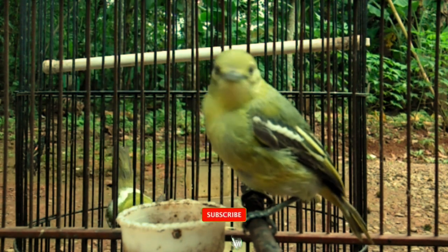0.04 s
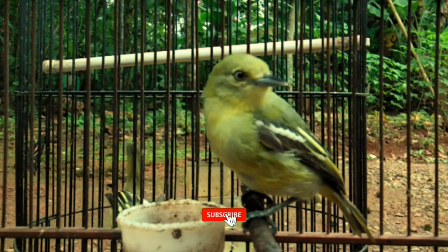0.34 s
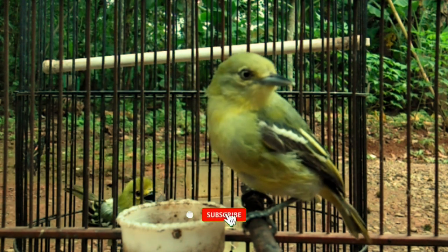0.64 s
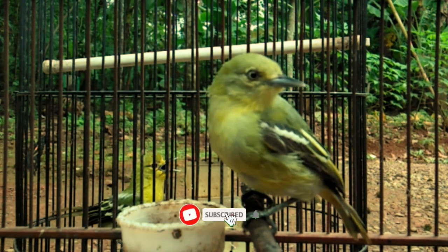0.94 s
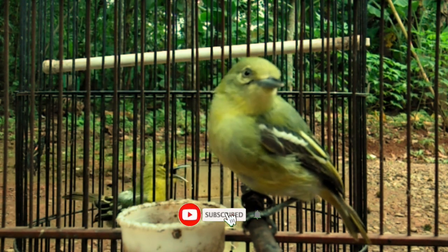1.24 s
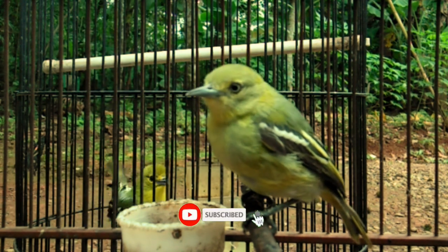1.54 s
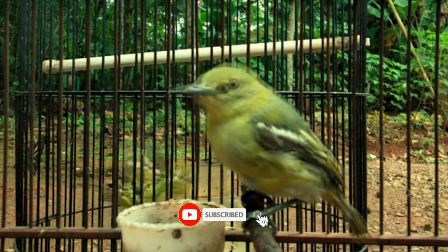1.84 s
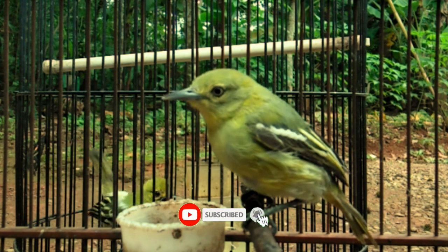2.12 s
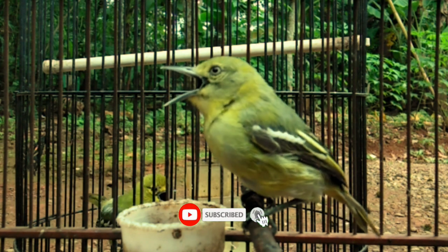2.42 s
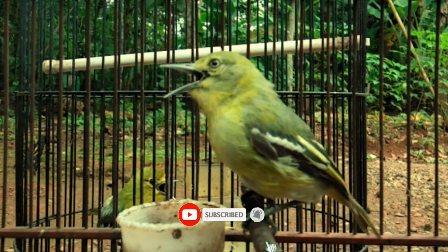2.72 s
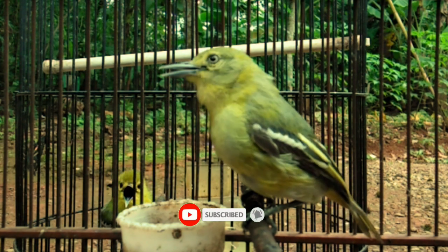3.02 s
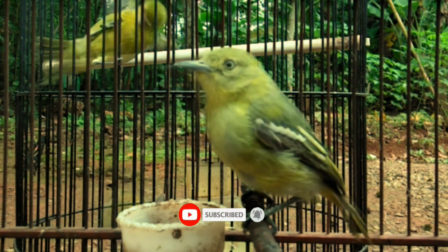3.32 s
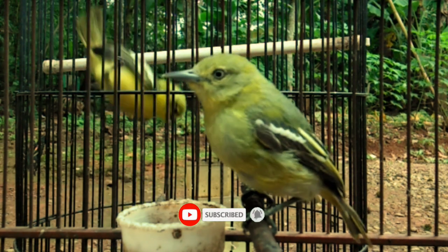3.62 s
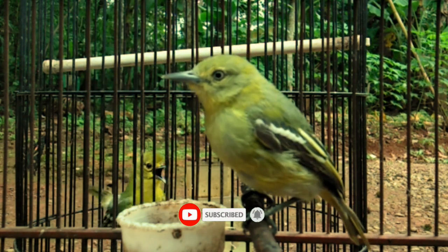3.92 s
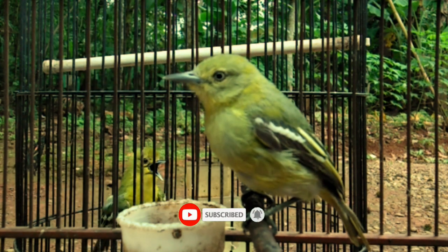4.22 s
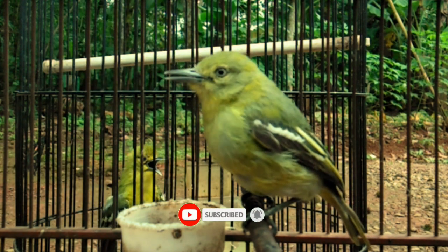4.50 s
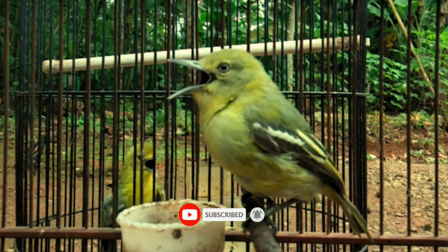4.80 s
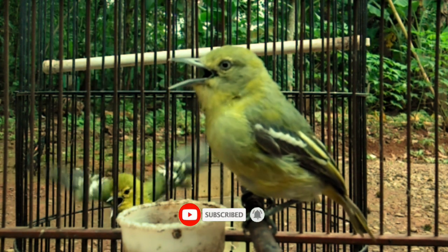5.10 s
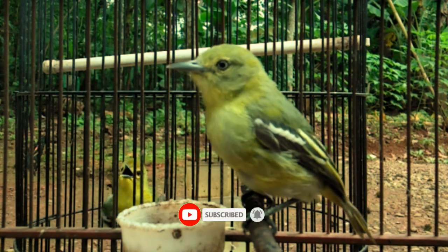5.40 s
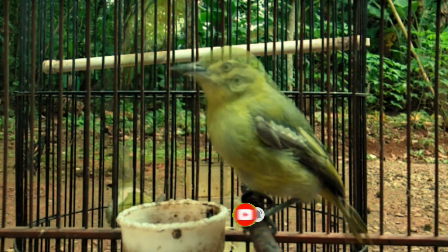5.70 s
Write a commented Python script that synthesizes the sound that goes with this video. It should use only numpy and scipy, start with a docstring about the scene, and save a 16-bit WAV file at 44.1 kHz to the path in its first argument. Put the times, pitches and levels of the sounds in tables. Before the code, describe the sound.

A songbird in an outdoor cage, heard up close, lets out two loud, hoarse, descending rasps about two seconds apart, each trailing into a quiet clicking chatter. A second, much softer bird adds short runs of rising pips, muttering, a quick flutter and a clear whistle leading into the second rasp. The cage ticks once near the end. Thin insect shrills, faint distant calls and a low rumble lie behind.

```python
"""A caged iora, close by, gives two loud falling rasps, each ending in a low chatter.
Air drives both sides of its syrinx in about fifty bursts a second; the chatter is clicks ringing its throat.
A second bird pips, whistles, mutters softly and flutters. One sharp tick comes from the cage.
Insects shrill behind them over a low outdoor rumble and faint far calls."""
import sys
import numpy as np
from scipy import signal
from scipy.fft import rfft, irfft
from scipy.io import wavfile
from scipy.ndimage import uniform_filter1d, minimum_filter1d

SR = 44100
rng = np.random.default_rng(int(sys.argv[2]) if len(sys.argv) > 2 else 0)


def bounce(signal):
    """Save signal as a 16-bit WAV file at the path given by the first command-line argument."""
    frames = np.transpose(np.atleast_2d(signal))
    limited = np.clip(frames, -1, 1)
    pcm = np.round(limited * 32767).astype(np.int16)
    wavfile.write(sys.argv[1], SR, pcm)


N = 253575
T = np.arange(N) / SR


def rasp(start_s, length_s, attack_s, burst_hz, peak_db, swell_db, opening_s, fall_s, end_hz, overtone_db):
    """Falling buzz: air bursts drive two voices, rush through the beak and ring the throat."""
    # air rush through the open beak: freq_hz, gain_db
    beak = [(600, -13), (1100, -13), (1550, 0), (2050, 0), (2400, -2), (2800, 6), (3300, 2.5), (5000, 10.5),
            (6400, -1), (7700, -18), (8700, -19.5), (13000, -19.5), (15500, -8)]
    top_hz, opening_hz, settle_s, lower_ratio = 5910, 610, .13, .9
    swell_s, hold_s, release_s, relax_s = .18, .1, .028, .098
    lead_change_s, slowing_hz = .07, 3.8
    end_s, progress = start_s + length_s, ramp(start_s, length_s)
    hz = top_hz + (end_hz - top_hz) * ramp(start_s, fall_s) ** 2.15
    upper_hz = hz + opening_hz * (1 - ramp(start_s + opening_s, settle_s))
    # upper voice leads at the opening and the close, nearly level between
    lead_db = 5.5 - 4 * ramp(start_s + opening_s - lead_change_s / 2, lead_change_s)
    lead_db += 8.5 * ramp(end_s - .16, lead_change_s)
    fade_start_s = start_s + attack_s + swell_s + hold_s
    slack = 1 - ramp(start_s + attack_s, swell_s) + .83 * ramp(fade_start_s, end_s - fade_start_s)
    effort_db = -swell_db * slack - 29 * (1 - ramp(start_s, attack_s))
    effort_db -= 9.5 * ramp(end_s - release_s, release_s)
    cycles = np.cumsum((burst_hz - slowing_hz * progress) * (T > start_s)) / SR
    burst = np.sin(np.pi * (cycles + .03 * wander(25))) ** 2
    push = burst ** .9
    lead = undb(lead_db + 2 * wander(25))
    both_sides = syrinx(hz * lower_ratio, burst) + lead * syrinx(upper_hz, burst)
    fundamentals, overtones = both_sides / np.hypot(1, lead)
    overtones *= undb(overtone_db - 4.5 * ramp(end_s - relax_s, relax_s))
    # membranes keep swinging between bursts, less so late in the call; overtones throb least
    leak = .51 - .478 * progress
    voices = fundamentals * (push + leak) / (.68 + leak) + overtones * (push + 1) / 1.5
    rush_level = undb(-36 + .05 * effort_db) * np.sqrt(gate(start_s, end_s, edge_s=.01))
    rush = noise(beak) * (burst + .099) * rush_level
    throat_hz = 1600 + 484 * progress + 170 * wander(300)
    undertone = tone(throat_hz) * burst * undb(-47) * np.sqrt(progress)
    voices *= undb(peak_db - 2 + effort_db + 1.08 * wander(25))
    return gate(start_s, end_s) * (voices + rush + undertone)


def syrinx(hz, burst, arch_hz=360, jitter_hz=200, shimmer_db=2.5, hoarseness=.12):
    """One side of the syrinx as [fundamental, overtones]; pitch arches with each burst and shakes."""
    # overtone strength by where it falls: freq_hz, gain_db
    overtone_curve = [(6000, -16), (8000, -37), (9800, -34.5), (11000, -38.5), (12200, -29), (13400, -26),
                      (14700, -12), (16000, -18.5)]
    # windpipe passband with a sharp lower edge: freq_hz, gain_db
    windpipe = [(1500, -26), (2500, -22), (2900, -14), (3150, 0), (5300, 0), (6500, 0), (7800, 3),
                (8700, -6), (11000, -9), (15000, -3)]
    hz = hz * (1 + .012 * wander(40)) + arch_hz * (burst - .75) + jitter_hz * wander(550)
    freq_hz, gain_db = np.transpose(overtone_curve)
    overtones = sum(tone(k * hz) * undb(np.interp(k * hz, freq_hz, gain_db)) * (k * hz < SR * .4)
                    for k in (2, 3))
    # uneven swings spread a hoarse skirt around the pitch
    fundamental = tone(hz) * (1 + hoarseness * wander(1900))
    return np.array([colour(fundamental, windpipe), overtones]) * unit(undb(shimmer_db * wander(600)))


def chatter(creak_hz=149.4, slowing_s=.02, hiss_db=-19, hiss_s=.00034, ring_attack_s=.0013):
    """Creaky notes: clicks slow down while the lowest throat resonance rises and grows."""
    # notes: start_s, length_s, level_db, first_click_hz, bright_mode_db
    notes = [(3.004, 0.025, -37.5, 900, -28), (3.013, 0.06, -35.5, 448, -25),
             (3.085, 0.047, -37, 477.7, -18), (3.157, 0.045, -39, 476, -15), (3.228, 0.037, -44, 449, -22),
             (3.298, 0.037, -49.5, 445, -22), (3.372, 0.033, -61, 453, -22),
             (5.306, 0.026, -40.5, 747, -16), (5.323, 0.031, -43.5, 514, -10),
             (5.348, 0.029, -44, 709, -13), (5.373, 0.047, -42, 600, 13.5)]
    # throat resonances, low to bright: freq_hz, width_hz, gain_db, rise_share
    throat = [(1790, 320, 0, .38), (2480, 300, 0, .08), (3230, 400, 0, .04), (4700, 900, 0, .25)]
    out, t = np.zeros(N), T[:SR // 10]
    for start_s, length_s, level_db, first_click_hz, bright_mode_db in notes:
        progress = np.clip(t / length_s, 0, 1)
        click_hz = creak_hz + (first_click_hz - creak_hz) * np.exp(-t / slowing_s)
        click_hz *= 1 + .1 * wander(300)[:len(t)]
        cycles = np.floor(np.cumsum(click_hz) / SR)
        clicks = np.flatnonzero(np.diff(cycles) * (progress[1:] < 1))
        age_s, place = np.maximum(t - t[clicks, None], 0), progress[clicks, None]
        strength = np.clip(np.minimum(place, 1 - place) / .21, 0, 1)
        low_mode_db = 5 - 20 * np.log2(first_click_hz / 462)  # weaker after a fast start
        weights = [undb(low_mode_db) * (.25 + 1.55 * place), 2.83 * np.exp(-1.9 * place),
                   1.05 - .23 * place, undb(bright_mode_db)]
        pulses = undb(hiss_db) * np.exp(-age_s / hiss_s) * (age_s > 0) * rng.standard_normal(len(t))
        for (freq_hz, width_hz, gain_db, rise_share), weight in zip(throat, weights):
            ring = np.exp(-np.pi * width_hz * age_s) * (1 - np.exp(-age_s / ring_attack_s))
            mode_hz = freq_hz * (1 + rise_share * (place - .5))
            pulses += weight * undb(gain_db) * ring * np.sin(2 * np.pi * mode_hz * age_s)
        note = unit((strength * pulses).sum(axis=0))
        i = int(start_s * SR)
        out[i:i + len(t)] += note * undb(level_db) * np.sqrt(t[-1] / length_s)
    return colour(out, [(500, -12), (1400, -9), (7000, -6), (10000, -21.5)])


def whistle(start_s=4.388, break_s=4.495, end_s=4.768, high_hz=3116, held_hz=2972):
    """Second bird's nearly pure note: scoops up, steps down, swells and flicks up at the end."""
    scoop_hz, scoop_s, flick_hz, flick_s = 240, .022, 238, .0086
    step_s, swell_s, release_s = .012, .2, .022
    age_s, left_s = np.maximum(T - start_s, 0), np.maximum(end_s - T, 0)
    step = ramp(break_s - step_s / 2, step_s)
    hz = high_hz + (held_hz - high_hz) * step
    hz += flick_hz * np.exp(-left_s / flick_s) - scoop_hz * np.exp(-age_s / scoop_s)
    hz *= 1 + .0035 * wander(60)
    level_db = -28.5 - 24.5 * (1 - ramp(start_s, swell_s)) - 6.5 * step
    level = undb(level_db) * np.minimum(left_s / release_s, 1) * gate(start_s, end_s)
    return (tone(hz) + undb(-21) * tone(2 * hz) + undb(-34) * tone(4 * hz)) * level


def pips(count=5, target_hz=3004, first_flat_hz=220, half_length_s=.014, droop=.15):
    """Second bird's runs of short arched notes that climb and grow louder."""
    # pip runs: start_s, spacing_s, first_db, growth_db_per_pip
    runs = [(1.187, .0741, -56.5, 1.8), (4.068, 0.072, -56.5, 0.8)]
    out = np.zeros(N)
    for start_s, spacing_s, first_db, growth_db in runs:
        for k in range(count):
            offset = np.clip((T - start_s - k * spacing_s) / half_length_s, -1, 1)
            hz = (target_hz - first_flat_hz / 2 ** k) * (1 - droop * offset ** 2)
            out += tone(hz) * undb(first_db + k * growth_db) * np.cos(np.pi * offset / 2) ** 2
    return out


def mutter(throb_hz=40, throb_depth=.31, attack_s=.066, release_s=.31):
    """Second bird's soft throbbing noise under its pips."""
    # mutters: start_s, length_s, level_db
    mutters = [(1.228, 0.58, -59), (4.077, 0.29, -61.5)]
    # mutter spectrum: freq_hz, gain_db
    spectrum = [(1100, -19), (1800, -1.5), (2300, -4), (3200, 2.5), (4000, 3), (5200, -9), (7000, -12.5),
                (10000, -54)]
    throb = unit(1 + throb_depth * tone(throb_hz * (1 + .051 * wander(6.6))))
    level = sum(undb(db) * ramp(start_s, attack_s) * (1 - ramp(start_s + length_s - release_s, release_s))
                for start_s, length_s, db in mutters)
    return noise(spectrum) * throb * level


def wings(beat_hz=29.9):
    """Second bird's feathers brush the air in quick soft beats."""
    # flutters: start_s, length_s, level_db
    flutters = [(3.62, .09, -66), (3.735, 0.055, -63.5)]
    # feather noise: freq_hz, gain_db
    spectrum = [(300, -4), (900, 4), (2200, 1), (4000, -11), (14000, -13)]
    beats = unit(np.sin(np.pi * beat_hz * T) ** 2 + .4)
    level = sum(undb(db) * gate(start_s, start_s + length_s, edge_s=.014)
                for start_s, length_s, db in flutters)
    return noise(spectrum) * beats * level


def cage_tick(start_s=5.411, gain_db=-22, snap_s=.00046):
    """A small hard knock on the cage: a snap and a brief ring."""
    # cage modes: freq_hz, level_db, t60_s
    modes = [(1960, -35, 0.004), (3050, 0.5, 0.0037), (6450, -14, 0.0048), (11260, -11, 0.014),
             (12070, -10.5, 0.026), (12800, -18, .02), (14800, -7, .003)]
    t = np.maximum(T - start_s, 0)
    ring = sum(undb(db - 60 * t / t60_s) * np.sin(2 * np.pi * hz * t) for hz, db, t60_s in modes)
    snap = .32 * noise([(600, -29), (1600, 6)]) * np.exp(-t / snap_s)
    return undb(gain_db) * colour((ring + snap) * (t > 0), [(600, -13), (1600, 1)])


def surroundings(x, scatter_db=-8, scatter_t60_s=.11, tail_db=-29, tail_t60_s=.3):
    """Adds close echoes, quick scatter round the cage and a faint short tail."""
    # echoes off close surfaces: delay_s, gain_db
    echoes = [(.000607, -10), (.00076, -16), (.000912, -15), (.001228, -13)]
    t = T[:SR // 2]
    scatter, tail = rng.standard_normal((2, len(t))) * (t > .002)
    scatter = undb(scatter_db) * unit(scatter * undb(-60 * t / scatter_t60_s))
    tail = undb(tail_db) * unit(tail * undb(-60 * t / tail_t60_s))
    response = (scatter + tail) / np.sqrt(len(t))
    for delay_s, gain_db in echoes:
        response += undb(gain_db) * np.sinc((t - delay_s) * SR)
    return x + signal.fftconvolve(x, response)[:N]


def shrill_insects(upper_hz=4510, lower_hz=4260, drift_hz=14, tremble_hz=28, shimmer=.56):
    """Two unbroken shimmering shrills; the lower one quietens for a while."""
    # upper insect's loudness: time_s, level_db
    upper_levels = [(0, -60), (.45, -63), (1.2, -64.5), (1.65, -61.5), (1.87, -65), (2.15, -58.5),
                    (3.4, -63.5), (5.75, -63.5)]
    upper_db = np.interp(T, *np.transpose(upper_levels))
    lower_db = -66 - 8 * gate(1.66, 3.48, edge_s=.091)
    out = np.zeros(N)
    for hz, level_db in ((upper_hz, upper_db), (lower_hz, lower_db)):
        pitch_hz = hz + drift_hz * wander(1.5) + tremble_hz * wander(140)
        out += tone(pitch_hz) * undb(level_db + wander(6)) * unit(1 + shimmer * wander(70))
    return out


def cricket(octave_db=-4, whine_db=-1, whine_floor_db=-83):
    """A thin insect note in stretches; its fourth harmonic whines on between them."""
    # song stretches: start_s, end_s, pitch_hz, level_db
    stretches = [(0, .35, 3350, -78), (.5, 1.45, 3370, -77), (1.7, 2.3, 3322, -76), (2.95, 3.3, 3322, -81),
                 (3.35, 4.05, 3362, -78), (4.2, 4.6, 3350, -81), (5.3, 5.8, 3360, -80)]
    starts_s, ends_s, pitches_hz, _ = np.transpose(stretches)
    hz = np.interp(T, (starts_s + ends_s) / 2, pitches_hz) + 9 * wander(120)
    level = sum(undb(db) * gate(start_s, end_s, edge_s=.13) for start_s, end_s, _, db in stretches)
    level *= undb(2 * wander(6.7))
    whine = (level * undb(whine_db) + undb(whine_floor_db)) * tone(4 * hz) * undb(3 * wander(15))
    return level * (tone(hz) + undb(octave_db) * tone(2 * hz)) + whine


def rumble(air_db=-55):
    """Outdoor air with a low rumble that swells now and then."""
    # outdoor air: freq_hz, gain_db
    air = [(25, -3.5), (45, -1.5), (85, 0.5), (125, -1.5), (175, -1), (260, -12.5), (480, -12.5),
           (700, -18), (1100, -21), (2000, -25.5), (3500, -30), (6500, -27.5), (8500, -36.5), (15500, -34)]
    # rumble swells: start_s, length_s, centre_hz, level_db
    swells = [(0.888, 0.68, 90, -59.5), (1.4, 0.41, 45, -59), (2.2, 0.9, 90, -54.5)]
    out = noise(air) * undb(air_db + wander(12))
    for start_s, length_s, centre_hz, level_db in swells:
        band = unit(resonate(rng.standard_normal(N), centre_hz, width_hz=centre_hz / 2))
        out += band * undb(level_db) * gate(start_s, start_s + length_s, edge_s=.097)
    return out


def far_calls():
    """Faint wavering calls, blurred by distance."""
    # calls: start_s, length_s, first_hz, last_hz, level_db
    calls = [(.72, .3, 1140, 1100, -73), (1.66, .6, 1650, 1560, -73), (1.92, .53, 765, 742, -64),
             (1.75, .6, 555, 570, -70), (3.2, .45, 960, 1030, -70)]
    out = np.zeros(N)
    for start_s, length_s, first_hz, last_hz, level_db in calls:
        end_s = start_s + length_s
        hz = np.interp(T, [start_s, end_s], [first_hz, last_hz]) * (1 + .025 * wander(77))
        out += tone(hz) * undb(level_db + 3 * wander(20)) * gate(start_s, end_s, edge_s=.072)
    return out


def undb(db):
    """Decibels to gain."""
    return 10 ** (np.asarray(db) / 20)


def unit(x):
    """Scale to rms 1."""
    return x / np.sqrt(np.mean(x ** 2) + 1e-20)


def ramp(start_s, length_s):
    """Linear rise from 0 to 1."""
    return np.clip((T - start_s) / length_s, 0, 1)


def gate(start_s, end_s, edge_s=.004):
    """1 between two times, with ramped edges."""
    return np.clip(np.minimum(T - start_s, end_s - T) / edge_s, 0, 1)


def tone(hz):
    """Sine of rms 1 on a moving pitch."""
    return np.sqrt(2) * np.sin(2 * np.pi * np.cumsum(hz) / SR)


def colour(x, points):
    """Filter by (freq_hz, gain_db) points."""
    hz, db = np.transpose(points)
    f = np.maximum(np.fft.rfftfreq(N, 1 / SR), 1)
    return irfft(rfft(x) * undb(np.interp(np.log(f), np.log(hz), db)), N)


def noise(points):
    """Coloured noise of rms 1."""
    return unit(colour(rng.standard_normal(N), points))


def wander(hz):
    """Smooth random motion of rms 1, rolling off above hz."""
    f = np.fft.rfftfreq(N, 1 / SR)
    return unit(irfft(rfft(rng.standard_normal(N)) * np.exp(-.5 * (f / hz) ** 2), N))


def resonate(x, hz, width_hz):
    """Steep resonance: the same band-pass twice."""
    b, a = signal.iirpeak(hz, hz / width_hz, fs=SR)
    return signal.lfilter(b, a, signal.lfilter(b, a, x))


def scene():
    """Both birds in their cage, the outdoors behind; mono."""
    # iora's rasps: start_s, length_s, attack_s, burst_hz, peak_db, swell_db,
    # opening_s, fall_s, end_hz, overtone_db
    rasps = [(2.257, 0.704, .05, 52.8, -9.5, 10, .08, .63, 3849, -1.5),
             (4.555, .718, 0.059, 51.7, -14, 6.5, .19, .70, 3626, -5.5)]
    iora = sum(rasp(*row) for row in rasps) + chatter()
    second_bird = whistle() + pips() + mutter() + wings()
    cage = surroundings(iora + second_bird) + cage_tick()
    return (cage + shrill_insects() + cricket() + rumble() + far_calls())[None]


def record(dry, ceiling=.82, window_samples=129, top_hz=15750):
    """Quick peak limiter, then a steep low-pass."""
    gain = minimum_filter1d(ceiling / np.maximum(np.abs(dry), ceiling), size=window_samples)
    limited = dry * uniform_filter1d(gain, size=window_samples)
    return signal.sosfilt(signal.ellip(10, .2, 80, top_hz, fs=SR, output="sos"), limited)


dry = scene()
out = record(dry)
bounce(out)
```